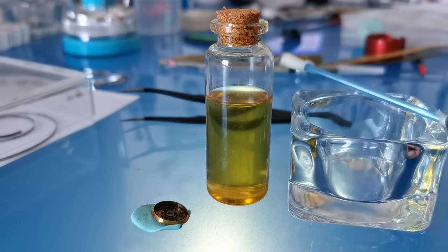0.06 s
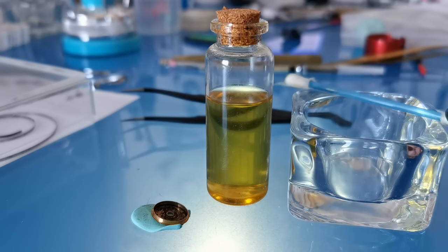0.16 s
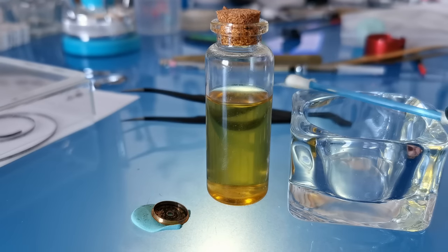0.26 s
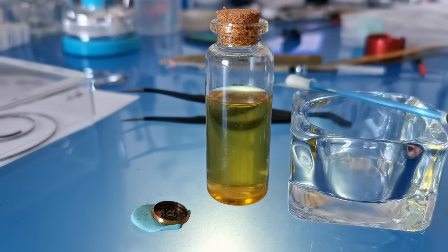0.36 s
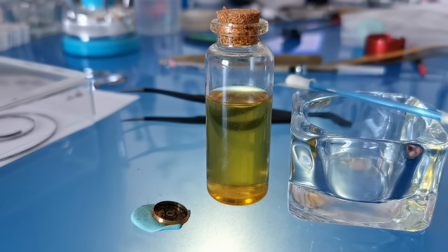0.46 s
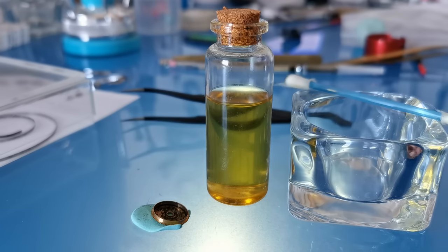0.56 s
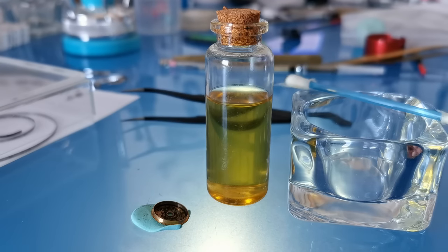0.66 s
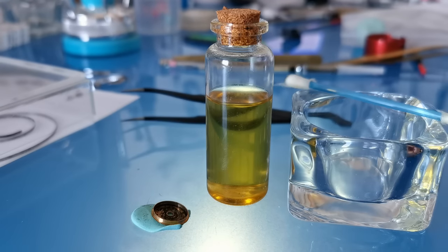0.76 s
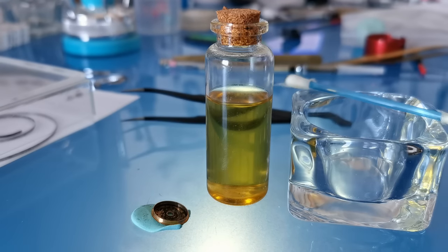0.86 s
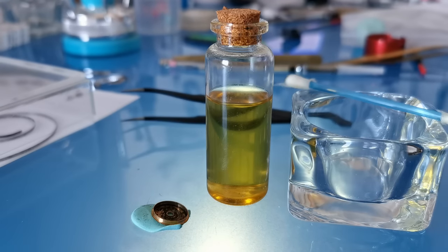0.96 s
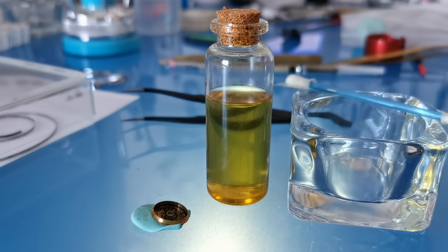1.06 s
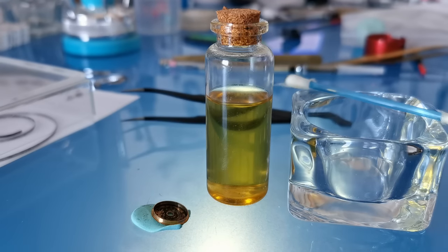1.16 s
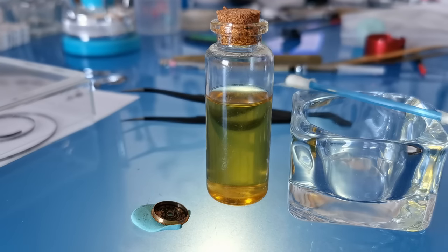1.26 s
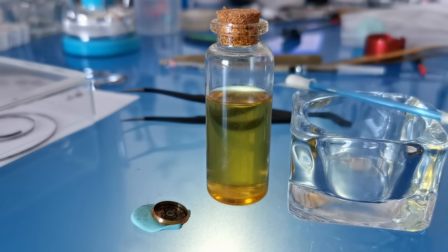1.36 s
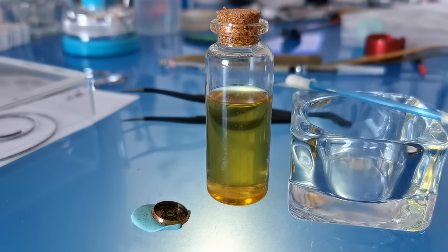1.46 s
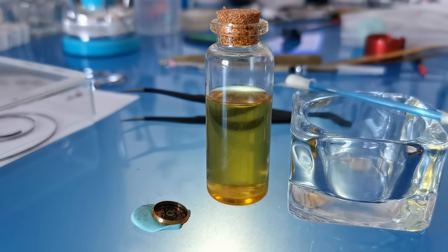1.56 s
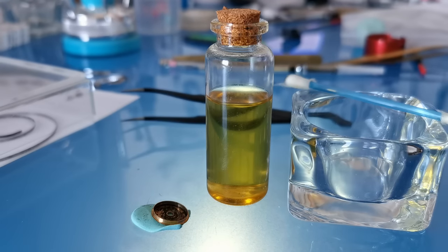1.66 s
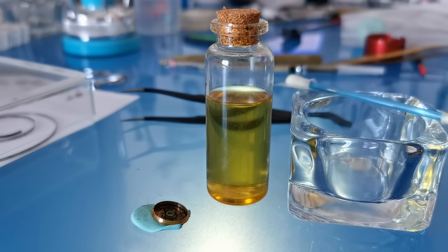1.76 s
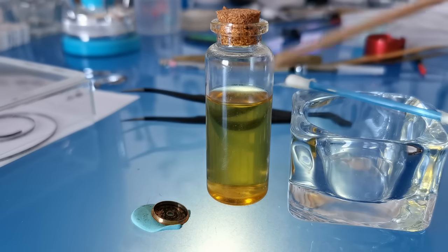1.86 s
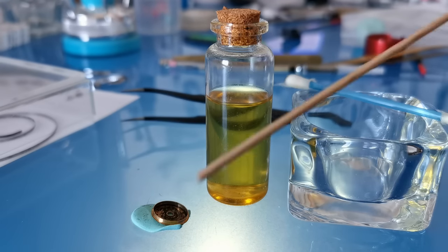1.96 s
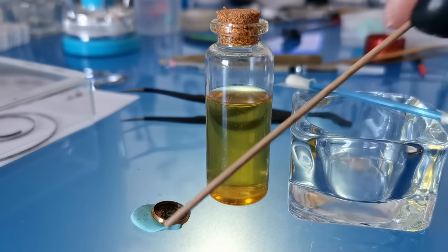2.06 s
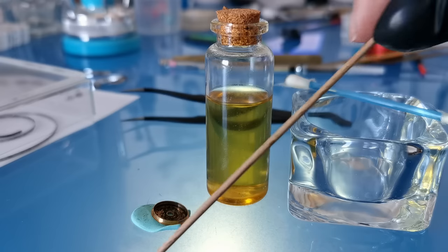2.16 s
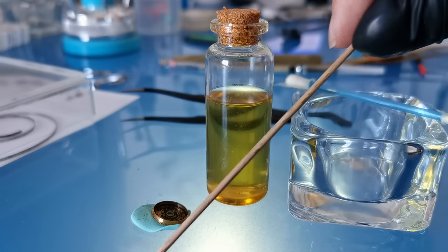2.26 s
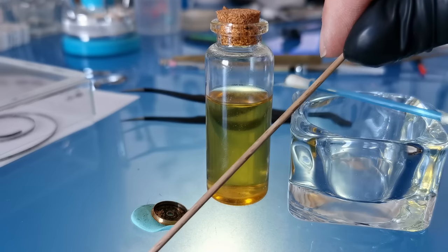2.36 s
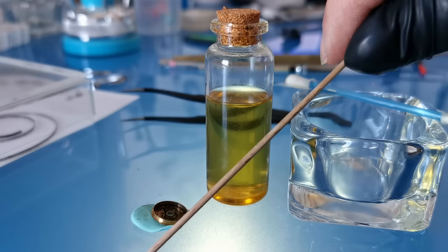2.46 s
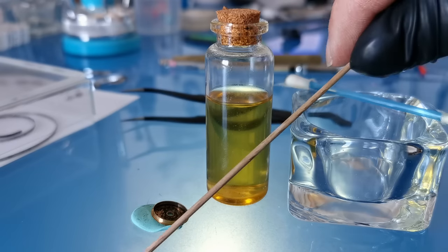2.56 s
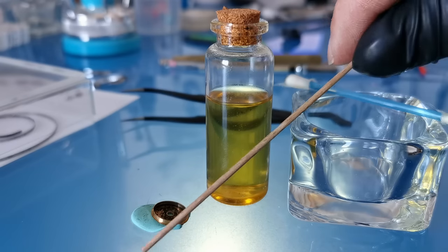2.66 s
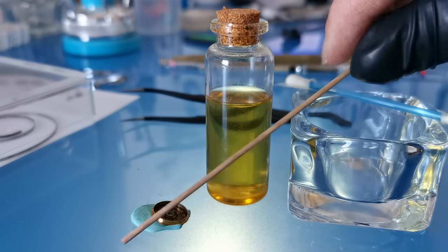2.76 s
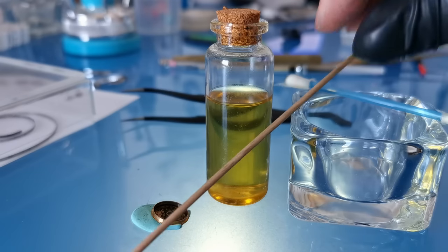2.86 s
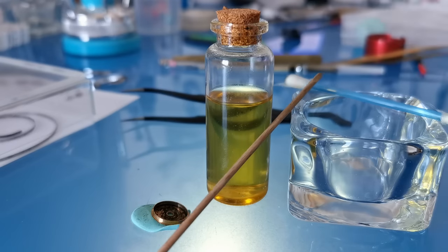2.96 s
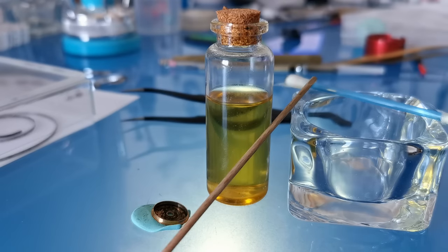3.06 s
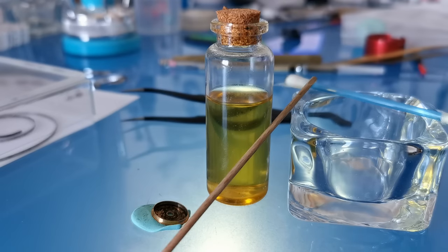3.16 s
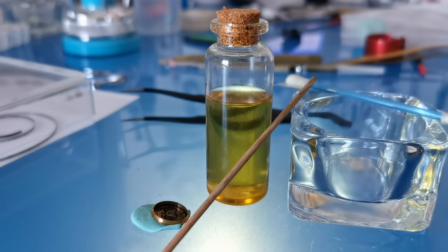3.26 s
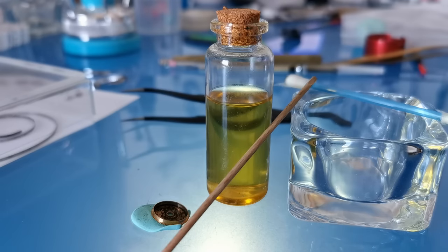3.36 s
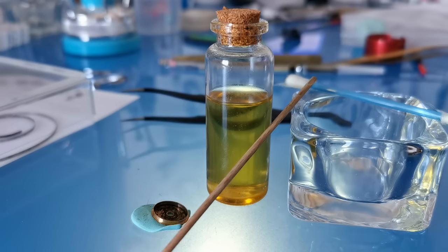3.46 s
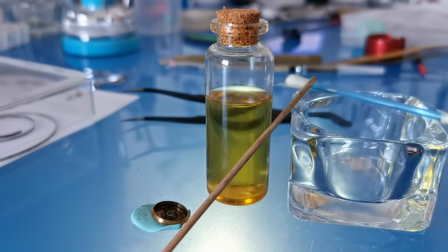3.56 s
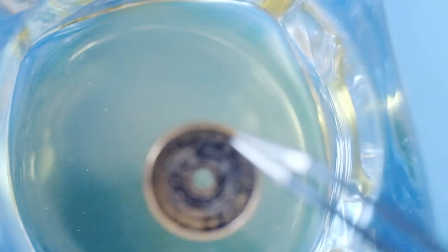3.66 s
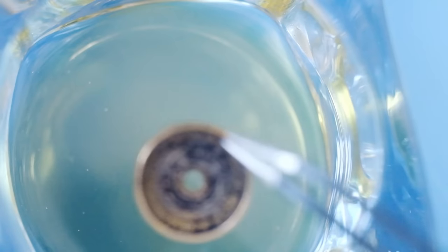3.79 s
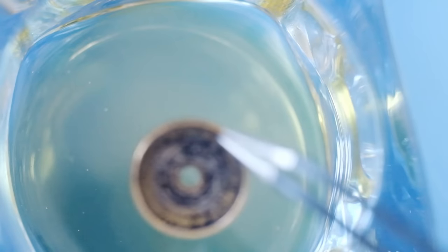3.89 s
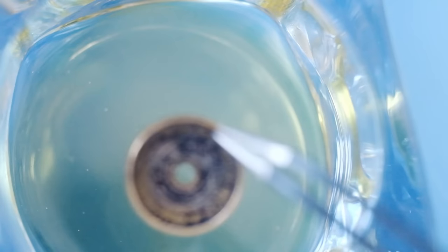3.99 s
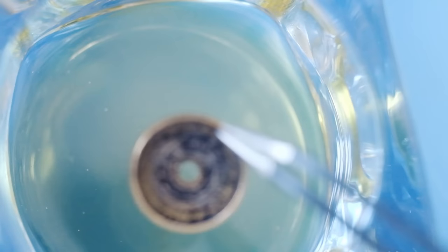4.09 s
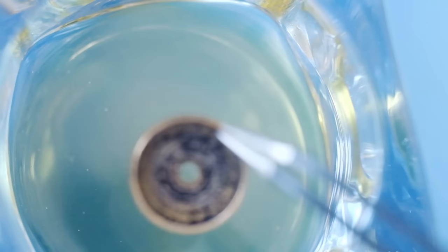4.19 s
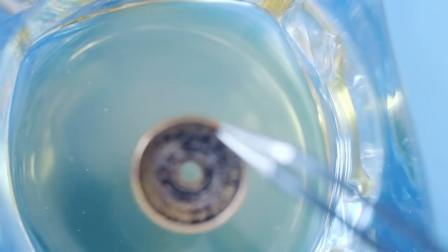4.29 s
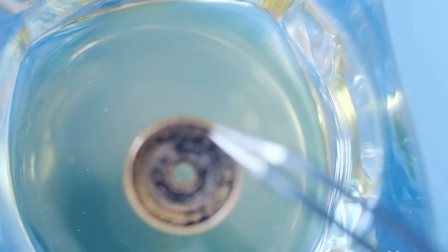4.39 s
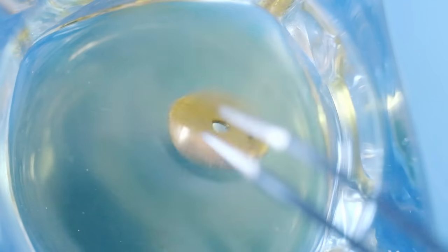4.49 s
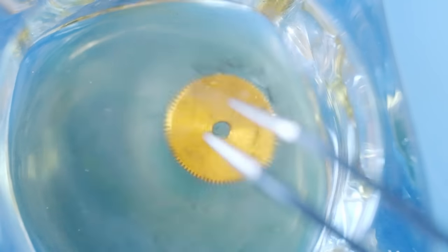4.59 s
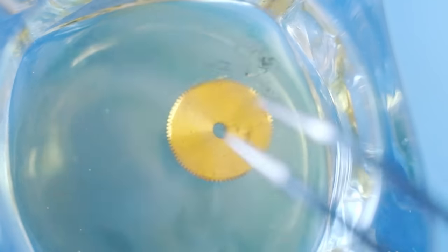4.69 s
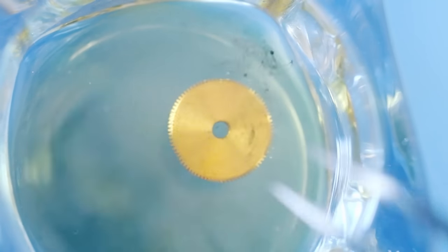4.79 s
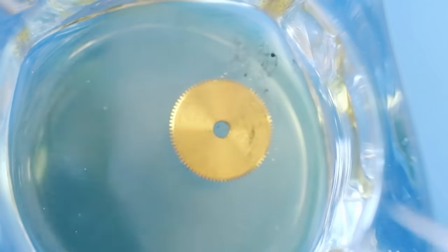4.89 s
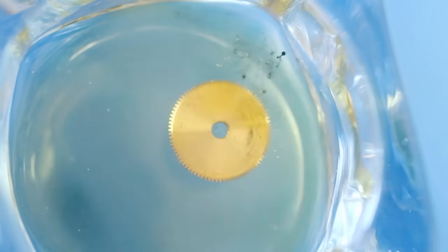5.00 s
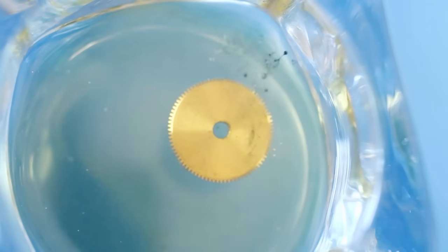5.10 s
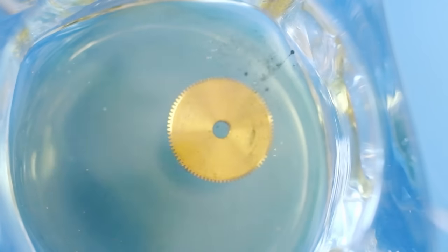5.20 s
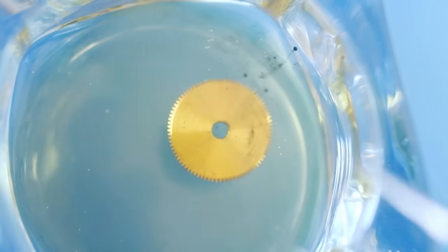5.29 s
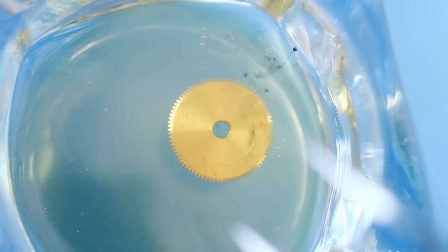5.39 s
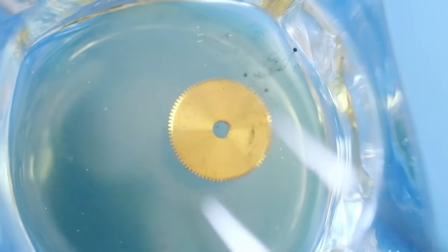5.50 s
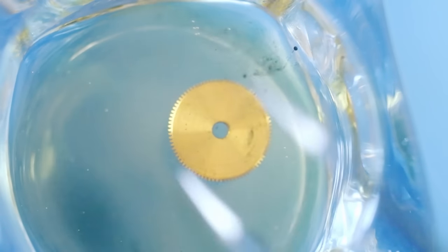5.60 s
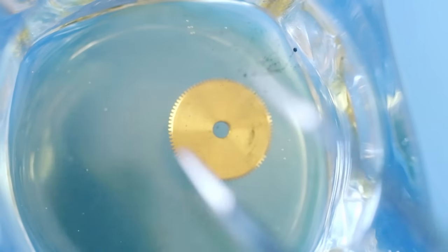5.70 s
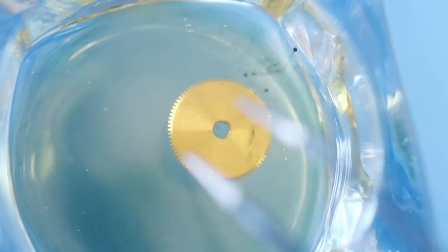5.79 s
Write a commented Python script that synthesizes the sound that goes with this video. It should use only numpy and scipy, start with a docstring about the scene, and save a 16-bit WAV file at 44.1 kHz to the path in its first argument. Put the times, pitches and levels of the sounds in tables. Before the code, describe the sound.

Close stereo microphone at a quiet workbench: soft low room noise and hiss, faint tool ticks to the right, a brief cloth brush, and a far engine rising in pitch. A thin wooden stick rattles lightly against a glass bottle. The room tone abruptly becomes a louder rush; a brass wheel slips from tweezers with a sharp clink, followed by a ringing glass-and-tweezers clink and a weak last tap. Faint distant bird chirps follow.

```python
"""Quiet workbench: hiss, hum and rumble (filtered noise, sines); small tools tick (snaps, decaying modes).
A sleeve brushes by (shaped noise); a far engine gains speed (gliding sine). A wooden stick laid against
a glass bottle rattles (many small modal blows). At 3.663 s the room tone steps up to a louder rush.
A brass wheel slips from steel tweezers and clinks in a filled glass dish (modes plus noise);
soon a far bird chirps (falling sines, randomly modulated)."""
import sys
import numpy as np
from scipy import signal
from scipy.fft import rfft, irfft, next_fast_len
from scipy.io import wavfile
from scipy.ndimage import map_coordinates

SR = 44100
rng = np.random.default_rng(int(sys.argv[2]) if len(sys.argv) > 2 else 0)


def wrap_up_sound(samples):
    """Save the sound to the file named by the first command line argument, as 16-bit audio."""
    columns = np.atleast_2d(samples).T
    # keep every value between -1 and 1, then stretch to whole-number steps
    tamed = np.clip(columns, -1, 1)
    steps = np.round(tamed * 32767).astype(np.int16)
    wavfile.write(sys.argv[1], SR, steps)


N = 257584

# Room noise spectra before and after the step: freq_hz, density_db_per_hz
QUIET_SPECTRUM = [(12, -35), (20, -1), (151, -6.5), (181, -5.5), (225, -10), (360, -8.5), (439, -13.5),
                  (481, -12), (1500, -26), (1950, -40), (3300, -120)]
RUSH_SPECTRUM = [(12, -50), (20, -7), (48, -7.5), (113, -1), (255, -0.5), (410, -1.5), (472, -5),
                 (527, -4.5), (897, -9), (1190, -10), (8650, -25.5), (9400, -27.5), (11100, -31),
                 (14700, -33), (16000, -40)]
# Left-right likeness of the room noises: freq_hz, likeness (-1 to 1)
QUIET_ALIKE = [(60, 0.68), (240, 0.63), (950, -0.095), (3770, -0.02), (15000, -0.66)]
RUSH_ALIKE = [(60, 0.01), (240, 0.32), (950, 0.16), (3770, 0.054), (15000, 0.15)]
# Left minus right level of the room noises: freq_hz, lean_db
QUIET_LEAN = [(60, 1), (240, -6), (950, -9), (3770, 3), (15000, -8.5)]
RUSH_LEAN = [(60, -0.5), (240, -1.5), (950, -1.7), (3770, -0.28), (15000, -0.14)]
# Hiss spectrum: freq_hz, density_db_per_hz
HISS_SPECTRUM = [(900, -29), (1400, -4.5), (2200, 1.5), (3300, -5), (5000, -4), (7300, -9.5), (9800, -9.5),
                 (10800, -4.5), (13000, -9), (14000, -10.5), (15300, -6), (16000, -12)]
# Hiss: freq_hz, likeness; freq_hz, lean_db
HISS_ALIKE, HISS_LEAN = [(3000, .02)], [(2000, -8), (5000, -1.0), (12000, -11.5)]
# Rumble: freq_hz, density_db_per_hz; freq_hz, likeness; freq_hz, lean_db
RUMBLE_SPECTRUM = [(15, -37), (30, 4.0), (70, -6.5), (130, -47.0)]
RUMBLE_ALIKE, RUMBLE_LEAN = [(50, 0.33)], [(50, 0)]
# Bench leaned on: start_s, level_db, hold_s
BENCH_LEANS = [(1.2, -64, 0.0), (1.87, -56.5, 0.15)]
# Appliance hum: pitch_hz, before_step_db, after_step_db
HUM_TONES = [(359.8, -71.5, -70), (706, -83, -81), (535.6, -94, -65.5), (9540, -110, -76.5)]
# Far engine track: time_s, pitch_hz, level_db
ENGINE_TRACK = [(1.2, 163, -86), (1.8, 169.4, -64.5), (2.5, 177.5, -74), (3.0, 189.7, -63.5),
                (3.6, 194, -70)]

# Tool contacts: start_s, snap_db, bench_knock_db, hollow_thud_db, tool_ring_db
TOOL_TICKS = [(0.0518, -51, -76, -61, -79), (0.1321, -51.5, -70, -50, -88), (0.2264, -66, -57, -61, -68),
              (0.2914, -50, -56, -49.5, -50.5), (0.3106, -44.5, -55, -63, -58),
              (0.9146, -46.5, -82, -71, -59), (1.1833, -54, -60.5, -68, -67),
              (1.5864, -51.5, -59, -71, -78), (1.7948, -58, -61.5, -69, -74), (2.4294, -60, -75, -70, -91)]
# Modes of bench, hollow thud and tool: freq_hz, level_db, t60_s
BENCH_MODES = [(1910, -2, 0.023), (2160, -1.5, 0.033), (2740, 0, 0.014), (2980, -6, 0.026)]
HOLLOW_MODES = [(750, 0.38, 0.012), (1120, -2.2, 0.0077)]
TOOL_MODES = [(7536, 0, .07), (11700, -8, .04)]
# Room decay: freq_hz, t60_s
ROOM_DECAY = [(500, 0.11), (2000, 0.37), (6000, 0.15), (12000, 0.041)]

# Sleeve strokes: start_s, end_s, start_db, end_db, start_speed (0-1), end_speed (0-1)
SLEEVE_STROKES = [(0.296, 0.325, -67, -77, 0.05, 0.05), (0.988, 1.028, -71, -70.5, 0.7, 0.5),
                  (1.294, 1.593, -63.5, -67.5, 0, 0.92)]
# Cloth friction spectra: freq_hz, density_db_per_hz
DULL_SPECTRUM = [(1000, -42), (2200, -2.5), (4500, -4.5), (7000, -11.5)]
BRIGHT_SPECTRUM = [(4000, -19), (7000, -6), (9000, -0.5), (10500, -3), (13000, -33)]
FINE_SPECTRUM = [(8500, -26), (11000, 3), (15000, -3), (17000, -30)]

# Stick contacts: start_s, crack_db, ring_db, height (0-1)
STICK_CONTACTS = [(2.8877, -50, -40, 0.15), (2.9074, -56.5, -60, 0.86), (2.9197, -58.5, -49.5, 0.83),
                  (2.9471, -54.5, -64, 0.45), (2.9575, -32, -42, 0), (2.9764, -52, -51, 0.98),
                  (2.9852, -54, -45, 0.3), (3.0, -50, -39.5, 0.59), (3.018, -49, -40.5, 0.48),
                  (3.0352, -52, -52, 0.5), (3.0459, -58.5, -48, 0.3), (3.0623, -55.5, -47.5, 0.4),
                  (3.0844, -66, -50, 0.34), (3.1161, -65, -68, 0.7)]
# Dense tiny contacts: start_s, end_s, level_db
CHATTER_SPANS = [(2.892, 2.92, -58), (2.965, 3.055, -58.5)]
# Their spectrum: freq_hz, density_db_per_hz
GRIT_SPECTRUM = [(900, -1), (1200, -1.5), (2200, -4), (2600, -2), (3020, -1), (3900, -8), (5200, 1),
                 (6200, -3), (7300, 5), (9200, -5), (10200, 6), (13000, -8), (16000, -11)]
# Modes of stick, cork, bottle neck and foot, small part's disc and rim: freq_hz, level_db, t60_s
STICK_MODES = [(1600, -9, .03), (2100, 0, .03), (2310, -3, .03)]
CORK_MODES = [(3020, 0, .04)]
NECK_MODES = [(13035, 0, .035), (13118, -6, .055), (13280, -5, .02)]
FOOT_MODES = [(9863, -1, .016), (10014, 0, .026)]
DISC_MODES = [(4912, -7, .03), (5636, -9, .025), (7310, 0, .045), (7540, 2, .013)]
RIM_MODES = [(8380, -1, .024), (11780, 0, .05), (14890, -6, .02)]
# Twin modes of the bottle wall: freq_hz, t60_s
WALL_MODES = [(6751, .3), (6777, .3)]
# Bottle wall pings, each faded out at its own end time: start_s, end_s, first_mode_db, twin_mode_db
WALL_PINGS = [(2.907, 2.99, -66, -50), (2.999, 3.02, -69, -65), (3.024, 3.104, -58, -48.5),
              (3.097, 3.166, -66, -57.5)]
# Heights (0-1) of rim, bottle foot, neck and cork
PLACE_HEIGHTS = (0.02, 0.33, 0.66, 0.98)
# How freely rim, foot, neck and cork ring: level_db
PLACE_FREE_DB = (-0.5, 1.5, 4.5, 2.5)

# Wheel and dish contacts: start_s, thud_db, wheel_db, dish_db, tweezers_db, noise_db, pan_db
WHEEL_CONTACTS = [(4.441, -72, -75, -75, -53, -52, 0.1), (4.4939, -22, -12.5, -59, -60, -29, 2.5),
                  (4.5537, -23, -48, -30, -27.5, -45, 1), (4.5826, -36, -49, -43.5, -49, -53, -5)]
# Modes of filled-dish thud, wheel, dish and tweezers: freq_hz, level_db, t60_s
LIQUID_MODES = [(2540, 0, .013), (2800, -4, .011)]
WHEEL_MODES = [(600, -19, .04), (900, -26, .03), (1330, -24, .03), (1705, -15, .03), (2140, -9, .01),
               (3150, -14, .014), (3650, -16, .01), (4510, -27, .024), (7290, -19, .03), (7420, -14, .03),
               (8100, 0, .008), (8900, -7, .013), (9720, -12, .012), (9945, -30, .24), (9965, -14, .05),
               (10040, -24, .09), (10280, -29, .12), (13700, -34, .006)]
DISH_MODES = [(1555, -12, .07), (1598, -11, .22), (1620, -6, .045), (1676, 0, .05), (1780, -13, .06),
              (2240, -18, .08), (2400, -20, .1)]
TWEEZERS_MODES = [(5520, -10, .007), (6500, -14, .035), (8700, -18, .12), (8780, 0, .012), (9980, -10, .02),
                  (14010, -6, .007)]
# Noisy body of a clink: freq_hz, density_db_per_hz
SPLASH_SPECTRUM = [(500, -24), (800, -2.5), (2500, 4.5), (4000, -5), (6000, -10), (8500, -2.5), (10500, -5),
                   (11500, -35), (14000, -17), (16000, -42)]

# Far bird: start_s, length_s, start_hz, end_hz, level_db
BIRD_CHIRPS = [(4.795, .055, 2850, 2350, -59), (4.97, .09, 2550, 2400, -59), (5.475, .075, 2800, 2550, -54),
               (5.6, .05, 2500, 2200, -56), (5.63, .09, 2550, 2300, -54)]

STEP_S, TOP_HZ = 3.663, 15830
QUIET_DB, RUSH_DB, HISS_DB = -64, -50.5, -73
LEAN_RISE_DB_PER_S, LEAN_FALL_DB_PER_S = 270, 62
SCATTER_DB = 1.5  # spread of mode strengths from blow to blow
TICK_HARDNESS, TICK_PAN_DB = 0.75, -6
BRUSH_RISE_DB_PER_S, BRUSH_FALL_DB_PER_S = 850, 630
DULL_FALL_DB_PER_S = 58  # the dull part lingers
SAG_DB_PER_S = 20  # long strokes slacken in the middle
# Level over the bright part at speeds 0 and 1
DULL_SLOW_DB, DULL_FAST_DB = -1, -6.5
FINE_SLOW_DB, FINE_FAST_DB = -13, 7
REACH_DB = 37  # loss per unit of height away from the contact
DISC_DB = -6.5  # the disc answers every contact
STICK_DB, STICK_FADE_DB_PER_S = -49.5, 92  # the stick's note weakens as it settles
RATTLE_PAN_DB = -7
CHATTER_RISE_DB_PER_S, CHATTER_FALL_DB_PER_S = 1100, 250


def amp(db):
    """Decibels to amplitude."""
    return 10 ** (np.asarray(db) / 20)


def unit(x):
    """Scales to rms 1."""
    return x / np.sqrt(np.mean(x ** 2) + 1e-20)


def along(points, hz):
    """Interpolates (freq_hz, value) points on a log axis."""
    f, v = np.transpose(points)
    return np.interp(np.log(hz + 1), np.log(f + 1), v)


def curves(rows):
    """One value per sample for each column after the time; -150 outside the table."""
    s, *cols = np.transpose(rows)
    return [np.interp(np.arange(N) / SR, s, c, -150, -150) for c in cols]


def wobble(rate_hz):
    """Smooth random curve, rate_hz knots a second."""
    knots = rng.standard_normal(int(N * rate_hz / SR) + 4)
    return map_coordinates(knots, [np.arange(N) * rate_hz / SR])


def swell(start_s, end_s, rise_db_per_s, fall_db_per_s):
    """dB that climb to 0 at start_s, hold until end_s and sink again."""
    t = np.arange(N) / SR
    return -rise_db_per_s * np.maximum(start_s - t, 0) - fall_db_per_s * np.maximum(t - end_s, 0)


def filtered(x, response):
    """Multiplies the spectrum of x by a response of frequency."""
    m = next_fast_len(N + 8192)
    return irfft(rfft(x, m) * response(np.fft.rfftfreq(m, 1 / SR)), m)[..., :N]


def noise(spectrum, alike, lean):
    """Stereo noise whose middle has rms 1; the mid-side balance sets the likeness of the channels."""
    def mid_side(hz):
        turn = np.arccos(np.clip(along(alike, hz), -1, 1)) / 2
        return amp(along(spectrum, hz)) * [np.cos(turn), np.sin(turn)]

    def left_right(hz):
        return amp(along(lean, hz) / 2 * np.array([[1], [-1]]))

    mid, side = filtered(rng.standard_normal((2, N)), mid_side)
    pair = filtered(np.array([mid + side, mid - side]), left_right)
    return pair / np.std(pair.mean(axis=0))


def ring(modes, spread_rad):
    """One blow: decaying modes of scattered strength, drifting slightly apart in phase left and right."""
    hz, db, t60_s = np.transpose(modes)[:, :, None]
    t = np.arange(SR // 6) / SR
    size, turn = rng.standard_normal((2, len(modes), 1))
    decay = amp(db + SCATTER_DB * size - 60 * t / np.maximum(t60_s, 1e-3))
    rise = (1 - np.exp(-t / .0001)) ** 2  # the contact lasts a moment
    drift = spread_rad * turn * (1 - np.exp(-t / 0.00093))
    return np.array([rise * np.sum(decay * np.sin(2 * np.pi * hz * t + side * drift), axis=0)
                     for side in (1, -1)])


def crack(t60_s, hardness):
    """Snap of contact: hard ones reach the top treble, softer ones centre lower."""
    t = np.arange(SR // 6) / SR
    shared = rng.standard_normal(len(t))
    burst = amp(-60 * t / t60_s) * (shared + 0.53 * rng.standard_normal((2, len(t))))
    soft = signal.lfilter(*signal.iirpeak(5500, 1.3, SR), burst)
    share = np.clip(hardness, 0, 1)
    return share * np.diff(burst, prepend=0) + 2 * (1 - share) * soft


def add(out, start_s, blow, pan_db, lag):
    """Places a blow; pan_db is left minus right, the left channel lags by lag samples."""
    for k, shift in enumerate((lag, 0)):
        part = out[k, round(start_s * SR + shift):][:blow.shape[1]]
        part += amp(pan_db / 2 * (-1) ** k) * blow[k, :len(part)]


def echo(x, wet_db):
    """Adds the room's answer: noise in which each frequency dies at its own speed."""
    hz, t, z = signal.stft(rng.standard_normal((2, SR // 2)), SR, nperseg=256)
    tail = signal.istft(z * amp(-60 * t / along(ROOM_DECAY, hz)[:, None]), SR, nperseg=256)[1]
    delayed = np.pad(x, ((0, 0), (130, 0)))
    wet = signal.fftconvolve(delayed, tail / np.linalg.norm(tail[0]), axes=1)[:, :N]
    return x + amp(wet_db) * wet


def room_tone():
    """Noise beds and wavering hum sines; rumble and a rising engine note before the step, rush after."""
    t = np.arange(N) / SR
    after = t >= STEP_S
    quiet = amp(QUIET_DB + 0.86 * wobble(3.91)) * noise(QUIET_SPECTRUM, QUIET_ALIKE, QUIET_LEAN)
    hiss = amp(HISS_DB + 0.16 * wobble(0.75)) * noise(HISS_SPECTRUM, HISS_ALIKE, HISS_LEAN)
    rush = amp(RUSH_DB + 0.11 * wobble(2.1)) * noise(RUSH_SPECTRUM, RUSH_ALIKE, RUSH_LEAN)
    lean_gain = sum(amp(db + swell(s, s + hold_s, LEAN_RISE_DB_PER_S, LEAN_FALL_DB_PER_S))
                    for s, db, hold_s in BENCH_LEANS)
    rumble = lean_gain * noise(RUMBLE_SPECTRUM, RUMBLE_ALIKE, RUMBLE_LEAN)
    hum = np.zeros(N)
    for hz, before_db, after_db in HUM_TONES:
        gain = amp(np.where(after, after_db, before_db) + 3.0 * wobble(8.7))
        hum += gain * np.sin(2 * np.pi * hz * t + 1.07 * wobble(14))
    engine_hz, engine_db = curves(ENGINE_TRACK)
    engine_gain = amp(engine_db + 0.9 * wobble(7.22))
    engine = engine_gain * np.sin(2 * np.pi * np.cumsum(engine_hz) / SR + .5 * wobble(10))
    return np.where(after, rush, quiet + hiss + rumble + engine) + hum


def ticks():
    """Small tools touch the bench off to the right: a snap plus modes of bench, hollow and tool."""
    out = np.zeros((2, N))
    for s, snap_db, knock_db, thud_db, ring_db in TOOL_TICKS:
        blow = amp(snap_db) * crack(0.0082, TICK_HARDNESS)
        blow = blow + amp(knock_db) * ring(BENCH_MODES, 0.61)
        blow = blow + amp(ring_db) * ring(TOOL_MODES, 0.39)
        blow = blow + amp(thud_db) * ring(HOLLOW_MODES, .3)
        add(out, s, blow, TICK_PAN_DB, lag=9.2)
    return echo(out, wet_db=-6.0)


def sleeve():
    """Cloth slides over the bench: grainy friction; the faster the stroke, the finer and less dull."""
    dull = noise(DULL_SPECTRUM, [(3000, 0.17)], [(3000, -6.5)])
    bright = noise(BRIGHT_SPECTRUM, [(9000, 0.17)], [(9000, -7)])
    fine = noise(FINE_SPECTRUM, [(13000, .2)], [(13000, -8)])
    out = np.zeros((2, N))
    for s, end_s, first_db, last_db, first_speed, last_speed in SLEEVE_STROKES:
        u = np.clip((np.arange(N) / SR - s) / (end_s - s), 0, 1)  # progress of the stroke
        speed = first_speed + (last_speed - first_speed) * u
        sag_db = SAG_DB_PER_S * (end_s - s) * np.sin(np.pi * u)
        db = first_db + (last_db - first_db) * u - sag_db
        dull_db = DULL_SLOW_DB + (DULL_FAST_DB - DULL_SLOW_DB) * speed
        fine_db = FINE_SLOW_DB + (FINE_FAST_DB - FINE_SLOW_DB) * speed
        dull_gate_db = swell(s, end_s, BRUSH_RISE_DB_PER_S, DULL_FALL_DB_PER_S)
        bright_gate_db = swell(s, end_s, BRUSH_RISE_DB_PER_S, BRUSH_FALL_DB_PER_S)
        out += amp(db + dull_db + dull_gate_db) * dull
        out += amp(db + bright_gate_db) * (bright + amp(fine_db) * fine)
    return amp(1.8 * wobble(120)) * out


def rattle():
    """Stick settles on bottle and small part: what is near a contact rings most; grit of tiny contacts."""
    out = np.zeros((2, N))
    places = (RIM_MODES, FOOT_MODES, NECK_MODES, CORK_MODES)
    for s, crack_db, ring_db, height in STICK_CONTACTS:
        blow = amp(crack_db) * crack(0.0086, hardness=1.0)
        blow = blow + amp(ring_db + DISC_DB) * ring(DISC_MODES, 1.0)
        stick_db = STICK_DB - STICK_FADE_DB_PER_S * (s - STICK_CONTACTS[0][0])
        blow = blow + amp(stick_db) * ring(STICK_MODES, 1.0)
        for place, free_db, modes in zip(PLACE_HEIGHTS, PLACE_FREE_DB, places):
            blow = blow + amp(ring_db + free_db - REACH_DB * abs(height - place)) * ring(modes, 1.0)
        add(out, s, blow, RATTLE_PAN_DB, lag=9)
    for s, end_s, *levels_db in WALL_PINGS:
        blow = ring([(hz, db, t60_s) for (hz, t60_s), db in zip(WALL_MODES, levels_db)], 0.75)
        fade = np.clip((end_s - s - np.arange(blow.shape[1]) / SR) / .01, 0, 1)
        add(out, s, blow * fade, RATTLE_PAN_DB, lag=9)
    grit = unit(amp(3.5 * wobble(250))) * noise(GRIT_SPECTRUM, [(5000, 0.21)], [(5000, 2)])
    chatter_gain = sum(amp(db + swell(s, end_s, CHATTER_RISE_DB_PER_S, CHATTER_FALL_DB_PER_S))
                       for s, end_s, db in CHATTER_SPANS)
    return echo(out, wet_db=-6.5) + chatter_gain * grit


def clinks():
    """Faint tweezers tick, bright wheel clink, ringing dish and tweezers clink, weaker last clink:
    modes of each body plus a noise burst."""
    out, splash_gain, t = np.zeros((2, N)), np.zeros(N), np.arange(N) / SR
    for s, thud_db, wheel_db, dish_db, tweezers_db, splash_db, pan_db in WHEEL_CONTACTS:
        blow = amp(thud_db) * ring(LIQUID_MODES, 0.32)
        blow = blow + amp(wheel_db) * ring(WHEEL_MODES, 0.27)
        blow = blow + amp(dish_db) * ring(DISH_MODES, 0.15)
        blow = blow + amp(tweezers_db) * ring(TWEEZERS_MODES, 0.39)
        add(out, s, blow, pan_db, lag=0)
        age_s = np.abs(t - s)
        snap = amp(-60 * age_s / 0.013)
        tail = amp(-7.5 - 60 * age_s / 0.3)
        splash_gain += (t >= s) * amp(splash_db) * (snap + tail)
    wet = echo(out, wet_db=-10)
    return wet + splash_gain * noise(SPLASH_SPECTRUM, [(3000, 0.33)], [(3000, 0)])


def bird():
    """Falling sine chirps, hoarse from fast random amplitude, blurred by echo."""
    out = np.zeros((2, N))
    for s, length_s, start_hz, end_hz, db in BIRD_CHIRPS:
        n = int(length_s * SR)
        phase = 2 * np.pi * np.cumsum(np.linspace(start_hz, end_hz, n)) / SR
        knots = rng.standard_normal((2, 200))
        hoarse = .3 + map_coordinates(knots, np.mgrid[:2, :n] * [[[1]], [[700 / SR]]])  # 700 knots/s
        chirp = amp(db) * np.hanning(n) ** 0.072 * hoarse * np.sin(phase)
        add(out, s, chirp, pan_db=3.0, lag=0)
    return echo(out, wet_db=-5)


def small_body(hz):
    """Small objects radiate little bass: second-order high-pass at 350 Hz."""
    return (1j * hz / 350) ** 2 / (1 + 1j * hz / 350) ** 2


def scene():
    """Sums room, contacts, sleeve and bird."""
    contacts = ticks() + rattle() + clinks()
    return room_tone() + sleeve() + filtered(contacts, small_body) + bird()


def record(dry):
    """Removes everything from TOP_HZ up."""
    return filtered(dry, lambda hz: hz < TOP_HZ)


dry = scene()
out = record(dry)
wrap_up_sound(out)
```